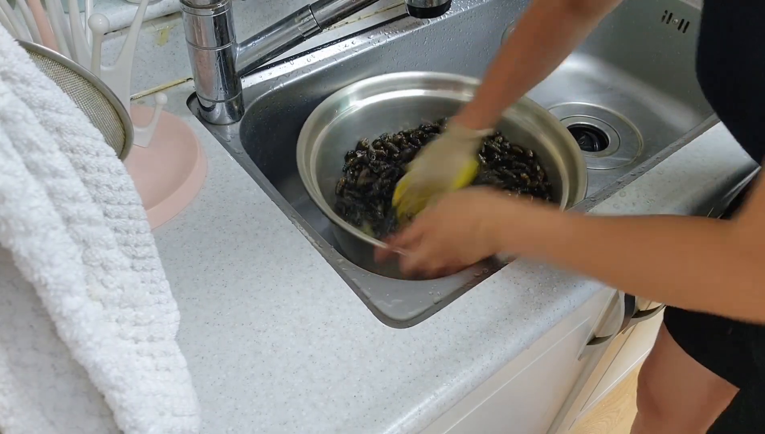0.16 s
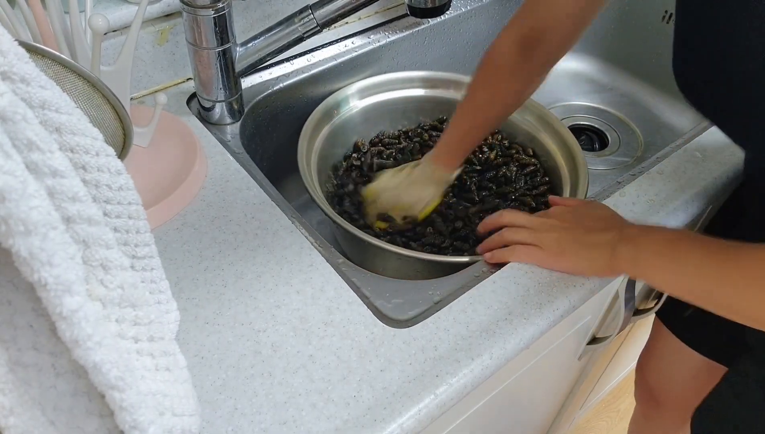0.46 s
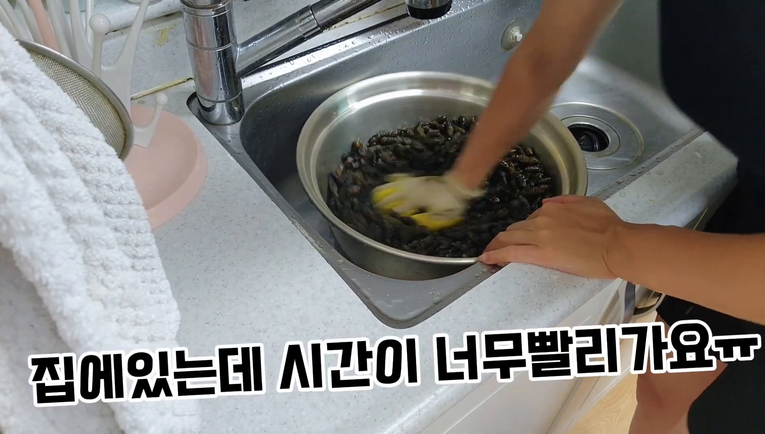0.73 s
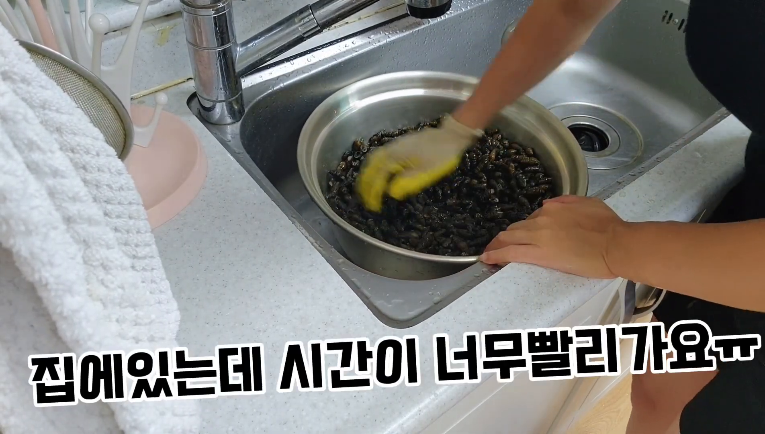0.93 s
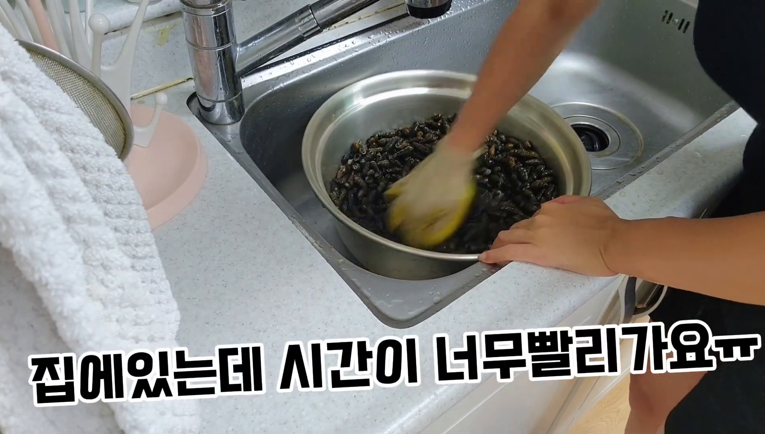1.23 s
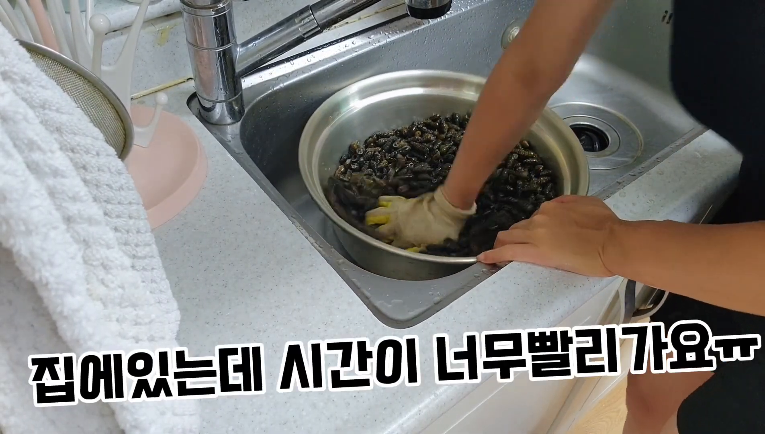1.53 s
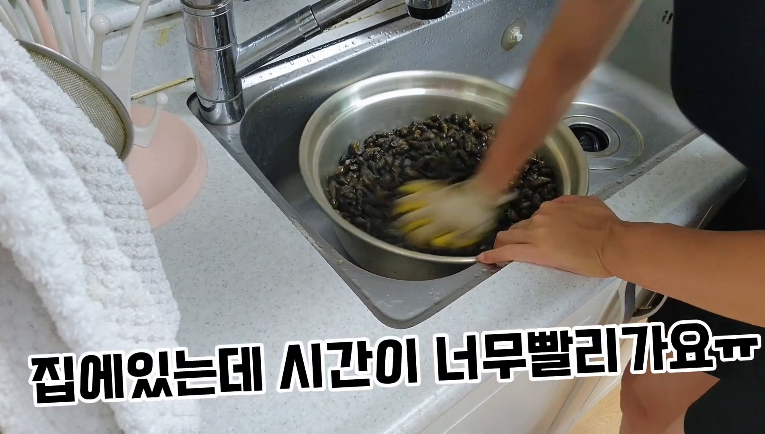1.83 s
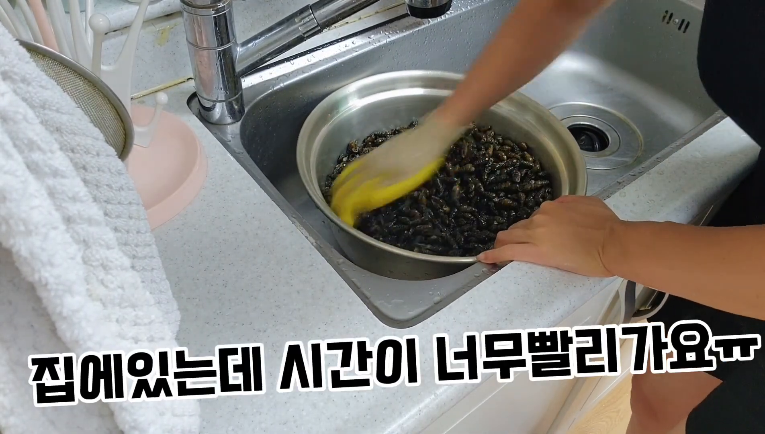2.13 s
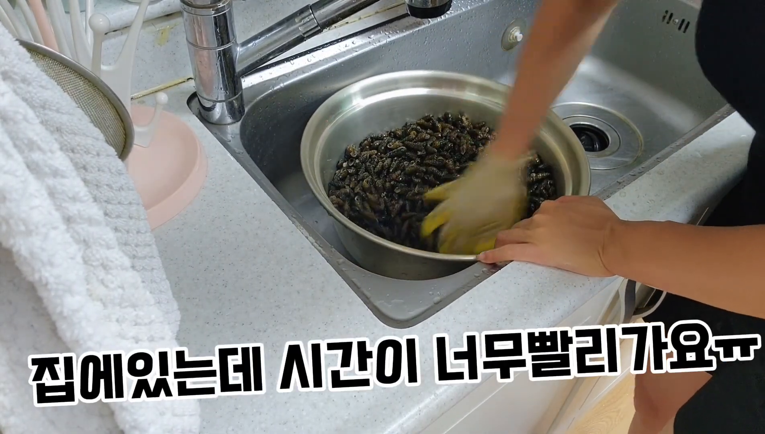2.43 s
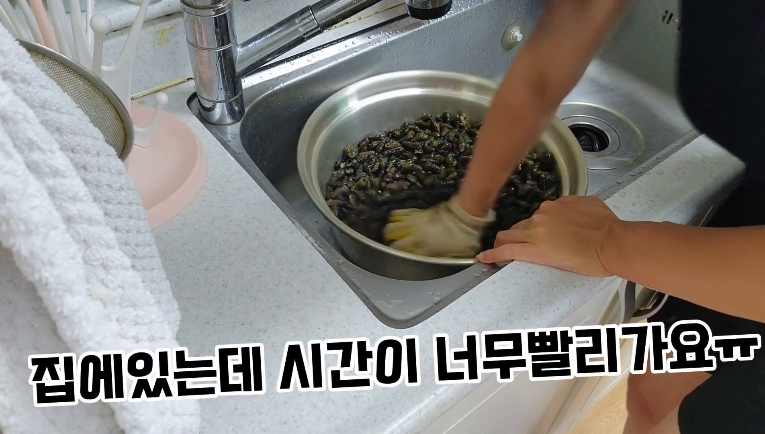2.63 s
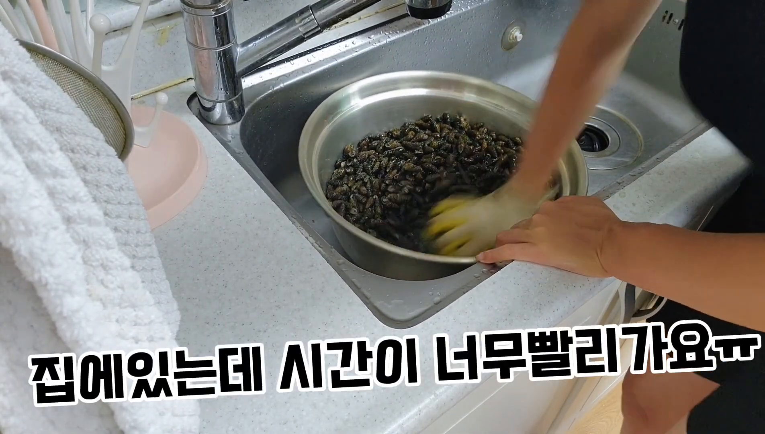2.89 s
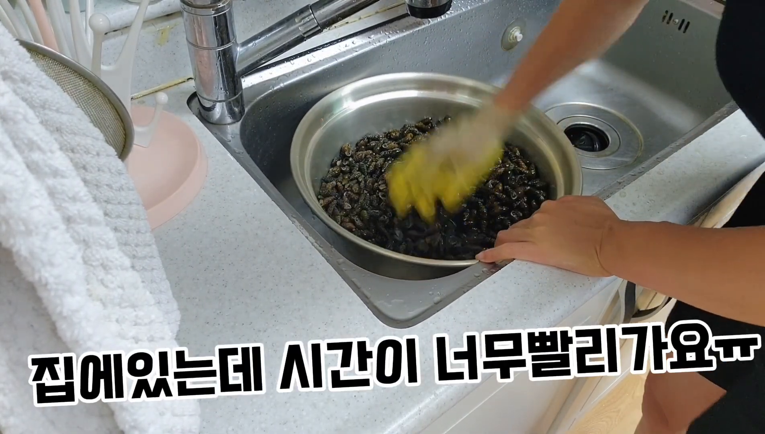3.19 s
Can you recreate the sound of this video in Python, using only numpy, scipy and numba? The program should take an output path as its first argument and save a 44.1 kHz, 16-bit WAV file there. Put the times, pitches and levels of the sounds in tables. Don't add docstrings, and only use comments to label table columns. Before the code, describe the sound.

Small hard snail shells rattle and scrape round a steel bowl under a gloved hand. Tumbling opens it, then dense gritty pushes peak near 0.3, 0.7, 1.07, 1.45, 1.86, 2.24, 2.57 and 2.95 seconds, with looser clatter between. A sharp slap ticks at 1.0; wet knocks, bowl rumble and soft basin thuds accompany. After 3.0 it fades to faint settling over quiet kitchen hum, heard brightly a metre away.

```python
import sys
import numpy as np
from scipy import signal
from scipy.fft import rfft, irfft
from scipy.io import wavfile
from scipy.ndimage import uniform_filter1d
from numba import njit

SR = 44100
rng = np.random.default_rng(int(sys.argv[2]) if len(sys.argv) > 2 else 0)


def rack_gain(trim_db):
    fader = np.asarray(trim_db, float)
    return 10 ** (fader / 20)


def transcribe(u):
    v = np.clip(np.atleast_2d(u).T, -1, 1)
    q = np.round(v * 32767).astype(np.int16)
    wavfile.write(sys.argv[1], SR, q)


N = 147735

# frequency_hz, level_db
KITCHEN_SPECTRUM = [(15, -48), (25, -13), (962, -13), (1520, -10), (2220, -13), (4490, -13), (7920, -14),
                    (16000, -10)]
# start_s, peak_db
BASIN_THUDS = [(0.063, -46), (0.171, -46), (0.348, -32), (0.478, -51), (0.704, -46), (1.08, -35),
               (1.443, -42), (1.829, -27), (2.187, -36), (2.596, -31), (2.735, -48), (2.95, -42)]
# frequency_hz, level_db, t60_s
BOWL_MODES = [(111, 1, .15), (186, 1, .12), (212, 1, .12), (299, 2, .11), (370, -6, .06), (457, -4, .08),
              (548, 2, .12), (752, 2, .11), (851, -2, .08), (1258, -4, .07), (1768, -3, .07),
              (2101, -5, .05)]
# frequency_hz, level_db
SCRAPE_SPECTRUM = [(70, -44.5), (100, -9.5), (200, -4), (700, 1), (1300, -3.5), (2200, -16), (4000, -28)]
# start_s, peak_db, pitch_hz
WET_KNOCKS = [(.01, -24.5, 294), (.27, -19, 745), (.293, -20.5, 286), (.324, -8.5, 577), (.335, -13, 717),
              (.37, -20, 206), (.635, -22.5, 880), (.691, -17, 219), (.72, -13, 445), (.76, -20.5, 540),
              (.962, -22, 2350), (1.073, -25.5, 580), (1.456, -5.5, 746), (1.844, -17.5, 252),
              (2.538, -45, 760), (2.58, 2.5, 1720), (2.645, -3, 1273), (2.928, -10, 860), (2.98, -12, 2000),
              (2.99, -12.5, 270), (1.068, -2.5, 1850), (2.869, -29.5, 112), (1.44, -24.5, 125)]
# frequency_hz, level_db
SHELL_SPECTRUM = [(700, -20), (1500, -10.5), (2500, -7.5), (4400, -4), (6300, -9), (8300, -17), (9700, -14),
                  (15500, -18.5)]
# frequency_hz, level_db, t60_s
TICK_MODES = [(1863, -26, .015), (3450, -11, .03), (4657, -10, .035), (5814, -18, .02), (9383, -24, .015),
              (11610, -21, .015)]
# start_s, full_s, end_s, level_db, end_level_db
HEAP_TUMBLES = [(-.1, -.01, 0.29, -21, -32), (.42, .5, 0.64, -25, -29.5), (.78, .82, 0.87, -30, -32.5),
                (1.011, 1.02, 1.058, -32, -24.5), (1.1, 1.16, 1.344, -24, -25.5),
                (1.55, 1.62, 1.76, -27, -26.5), (1.77, 1.79, 1.823, -21.5, -26),
                (1.93, 1.97, 2.035, -31, -32.5), (3.17, 3.24, 3.25, -46, -43.5),
                (2.32, 2.42, 2.59, -24, -29), (2.68, 2.72, 2.99, -28.5, -27), (3.0, 3.04, 3.16, -32, -36.5)]
# start_s, level_db, attack_s, t60_s
GLOVE_SLAPS = [
    (1.0126, -14, .001, .07),
    (2.827, -15, .013, .11),
    (2.1915, -25, .006, .4),
    (2.901, -20, .007, .15),
    (3.148, -32, .008, .08),
    (3.333, -43, .004, .1),
    (1.217, -19, .004, .04),
    (1.197, -21, .002, .04),
]
# touch_s, full_s, let_go_s, level_db, bowl_load_db (relative to level_db)
HAND_PUSHES = [
    (0.237, 0.32, 0.39, -14, -11.5),
    (0.61, 0.72, .76, -13.5, -11),
    (1.05, 1.07, 1.112, -15.5, -21),
    (1.378, 1.454, 1.546, -14.5, -15),
    (1.76, 1.859, 1.885, -14.5, -11.5),
    (2.202, 2.241, 2.258, -15, -21),
    (2.512, 2.573, 2.641, -13.5, -14.5),
    (2.878, 2.944, 2.994, -14.5, -11.5),
]


def unit(x):
    return x / np.sqrt(np.mean(x ** 2))


def colour(x, points):
    hz, db = np.array(points, float).T
    grid_hz = np.arange(1, 4098) * SR / 8192
    log_gain = np.interp(np.log(grid_hz), np.log(hz), db) * np.log(10) / 20
    cepstrum = irfft(log_gain)
    cepstrum[1:4096] *= 2
    cepstrum[4097:] = 0
    response = irfft(np.exp(rfft(cepstrum)))
    return signal.fftconvolve(x, response)[:N]


def ring(x, hz, t60):
    r = np.exp(-np.log(1000) / (t60 * SR))
    angle = 2 * np.pi * hz / SR
    return signal.lfilter([np.sin(angle) * np.sqrt(1 - r)], [1, -2 * r * np.cos(angle), r * r], x)


def flutter(rate_hz, spread_db):
    k = int(SR / rate_hz)
    wander = uniform_filter1d(uniform_filter1d(rng.standard_normal(N), k), k)
    return rack_gain(spread_db * unit(wander))


def motion(rows, rise, fall_db_s, lag_s=0.):
    t = np.arange(N) / SR - lag_s
    power = 0
    for start, full, end, db, end_db in rows:
        level_db = np.interp(t, [full, end], [db, end_db]) - fall_db_s * np.maximum(t - end, 0)
        ramp = np.clip((t - start) / (full - start), 0, 1) ** rise
        power = power + (rack_gain(level_db) * ramp) ** 2
    return np.sqrt(power)


@njit
def pings(at, hz, cycles, size, n, sr):
    out = np.zeros(n + 4000)
    for k in range(len(at)):
        turn = np.exp(hz[k] / sr * (2j * np.pi - 1 / cycles[k]))
        z = size[k] + 0j
        for i in range(min(int(6 * cycles[k] * sr / hz[k]), 4000)):
            out[at[k] + i] += z.real
            z *= turn
    return out[:n]


def clatter(gain, count, scatter_db, cycles, low_hz, high_hz, tone=SHELL_SPECTRUM):
    u = rng.random((count, 5)).T
    at = (u[0] * N).astype(np.int64)
    hz = (np.sqrt(low_hz) + (np.sqrt(high_hz) - np.sqrt(low_hz)) * u[1]) ** 2
    turns = cycles * rack_gain(7 * (2 * u[2] - 1.5)) * (hz / low_hz) ** 0.49
    strength = rack_gain(scatter_db * np.minimum(-np.log(1 - u[3]), 6))
    sign = np.sign(u[4] - .5)
    size = strength * sign * hz ** 0.58 / np.sqrt(turns)
    contacts = pings(at, hz, turns, size * gain[at], N, 1. * SR)
    return unit(colour(contacts, tone)) * np.sqrt(np.mean(gain ** 2))


def kitchen_hum():
    return unit(colour(rng.standard_normal(N), KITCHEN_SPECTRUM)) * rack_gain(-46)


def room_tail(shells):
    t60_s, level_db = .3, -12
    t = np.arange(SR // 2) / SR
    tail = rng.standard_normal(len(t)) * rack_gain(-60 * t / t60_s) * (t > .003)
    tail = tail / np.sqrt(np.sum(tail ** 2))
    return rack_gain(level_db) * signal.fftconvolve(shells, tail)[:N]


def sink(drive):
    mode_hz, t60_s, level_db, rise_s, hum_db = 49, 0.36, 4, 0.041, -58
    t = np.arange(N) / SR
    booms = np.zeros(N)
    for start, db in BASIN_THUDS:
        decay = rack_gain(db + level_db - 60 * np.maximum(t - start, 0) / t60_s)
        attack = np.clip((t - start) / rise_s, 0, 1)
        booms += decay * attack * np.sin(2 * np.pi * mode_hz * (t - start))
    hum = unit(ring(rng.standard_normal(N) * np.sqrt(drive), mode_hz, t60_s))
    return booms + hum * rack_gain(hum_db)


def steel(taps):
    return sum(rack_gain(db) * ring(taps, hz, t60) for hz, db, t60 in BOWL_MODES)


def bowl(load, tumble):
    tumble_ring_db, tumble_load_db, scrape_db, slosh_db = -14.5, -21, 1, -2
    sparse = rng.random(N) < .05
    taps = unit(rng.standard_normal(N) * rack_gain(2.66 * rng.exponential(size=N)) * sparse)
    ring_gain = (load + rack_gain(tumble_ring_db) * tumble) * flutter(60, 2.3)
    rung = steel(taps * ring_gain) / np.std(steel(taps))
    load = load + rack_gain(tumble_load_db) * tumble
    scrape = unit(colour(rng.standard_normal(N), SCRAPE_SPECTRUM)) * load * flutter(45, 1.67)
    slosh = clatter(load, count=600, scatter_db=3.0, cycles=3.0, low_hz=150.3, high_hz=1534,
                    tone=SCRAPE_SPECTRUM)
    return rung + rack_gain(scrape_db) * scrape + rack_gain(slosh_db) * slosh


def knocks():
    level_db, decay_cycles, attack_s = -1.5, 6.9, 0.0041
    out = np.zeros(N + SR)
    t = np.arange(SR // 4) / SR
    for start, db, hz in WET_KNOCKS:
        shape = np.exp(-t * hz / decay_cycles) * (1 - np.exp(-t / attack_s))
        note = np.sin(2 * np.pi * hz * t * (1 + 0.7 * t))
        i = int(start * SR)
        out[i:i + len(t)] += rack_gain(db + level_db) * shape * note
    return out[:N]


def settling_shells():
    return clatter(rack_gain(-53) * flutter(26, 1.3), count=5000, scatter_db=-2.5, cycles=2.0,
                   low_hz=870, high_hz=15700)


def tumbling_shells(tumble):
    return clatter(tumble * flutter(100, 0.56), count=30000, scatter_db=2.0, cycles=2.25,
                   low_hz=867, high_hz=16980)


def swish(gain):
    return rack_gain(-6) * unit(colour(rng.standard_normal(N), SHELL_SPECTRUM)) * gain


def tick():
    t = np.maximum(np.arange(N) / SR - GLOVE_SLAPS[0][0], 0)
    modes = sum(rack_gain(db - 60 * t / t60) * np.sin(2 * np.pi * hz * t) for hz, db, t60 in TICK_MODES)
    return modes * np.clip(t / 0.0016, 0, 1)


def slap_gain():
    t = np.arange(N) / SR
    gain = np.zeros(N)
    for start, db, attack, t60 in GLOVE_SLAPS:
        decay = rack_gain(db - 60 * np.maximum(t - start - attack, 0) / t60)
        gain += decay * np.clip((t - start) / attack, 0, 1)
    return gain


def pushed_shells(gain):
    return clatter(gain * flutter(135, 0.64), count=40000, scatter_db=2.5, cycles=1.4,
                   low_hz=888, high_hz=16860)


def scene():
    push_rows = [(a, b, c, db, db) for a, b, c, db, _ in HAND_PUSHES]
    load_rows = [(a, b, c, db + w, db + w) for a, b, c, db, w in HAND_PUSHES]
    push = motion(push_rows, rise=1.37, fall_db_s=215.5)
    load = motion(load_rows, rise=1.28, fall_db_s=215.5, lag_s=0.0086)
    tumble = motion(HEAP_TUMBLES, rise=0.55, fall_db_s=144)
    slap = slap_gain()
    shells = settling_shells() + tumbling_shells(tumble) + pushed_shells(push + slap)
    vessel = sink(push + tumble) + bowl(load, tumble) + knocks()
    near = shells + vessel + swish(push + tumble + slap) + tick()
    return (near + room_tail(shells))[None] * rack_gain(-4) + kitchen_hum()


def roll_off(x):
    return signal.sosfilt(signal.butter(12, 16540, fs=SR, output="sos"), x)


def record(dry):
    port_hz, port_width_hz, port_db, low_hz, top_hz = 4500, 950, 6.5, 38, 15830
    b, a = signal.iirpeak(port_hz, port_hz / port_width_hz, fs=SR)
    x = dry + (rack_gain(port_db) - 1) * signal.lfilter(b, a, dry)
    x = np.tanh(1.1 * x) / 1.1
    x = signal.sosfilt(signal.butter(3, low_hz, "high", fs=SR, output="sos"), x)
    x = signal.sosfilt(signal.ellip(12, .2, 70, top_hz, fs=SR, output="sos"), x)
    return roll_off(x)


dry = scene()
out = record(dry)
transcribe(out)
```